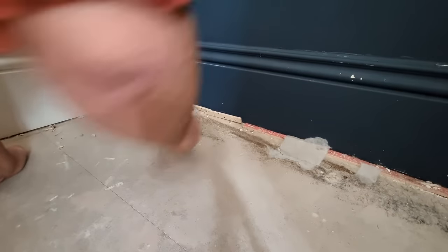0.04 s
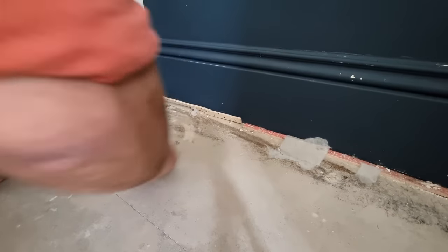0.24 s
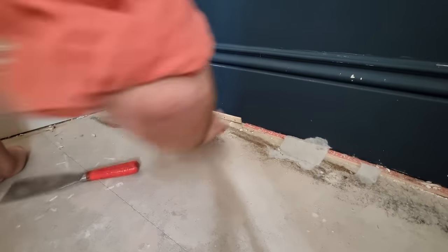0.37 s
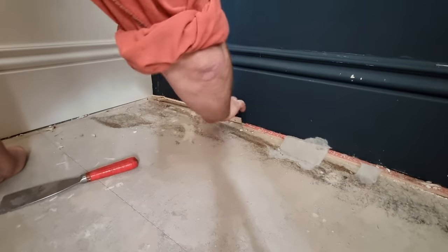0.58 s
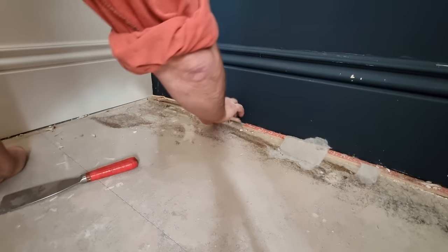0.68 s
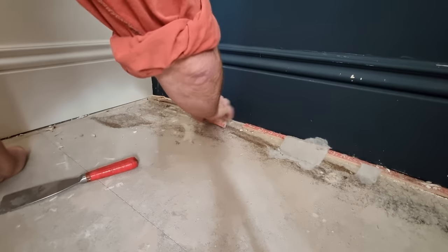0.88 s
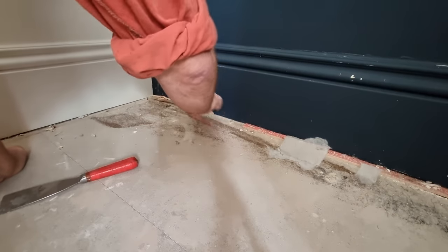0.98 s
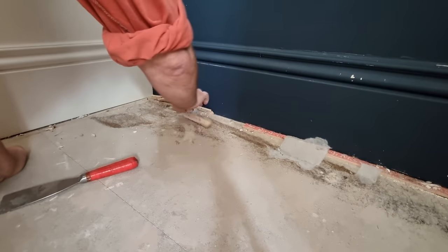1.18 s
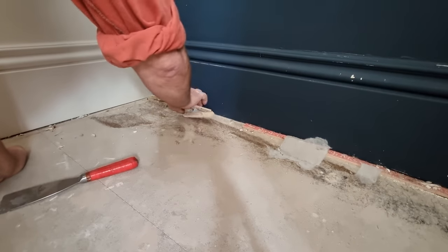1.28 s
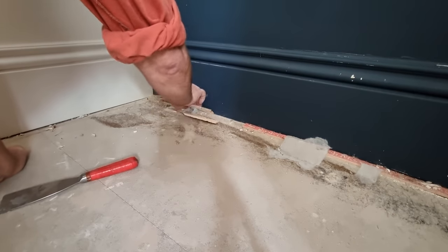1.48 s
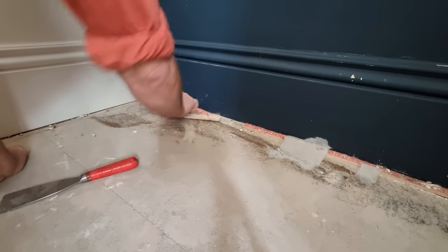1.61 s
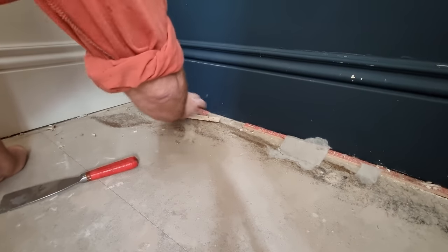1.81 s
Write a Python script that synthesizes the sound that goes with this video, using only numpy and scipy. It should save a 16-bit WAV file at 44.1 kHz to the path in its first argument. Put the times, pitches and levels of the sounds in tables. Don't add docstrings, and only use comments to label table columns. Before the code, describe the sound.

Dry wood snapping and scraping along a floor edge, opening with a flat metal tool clattering down beside loud cracks and low thumps, then sparser snaps and grit ticks; close stereo microphone, stronger at left, short bare-room echo.

```python
import sys
import numpy as np
from scipy import signal
from scipy.fft import rfft, irfft, next_fast_len
from scipy.io import wavfile
from scipy.ndimage import uniform_filter1d

SR = 44100
rng = np.random.default_rng(int(sys.argv[2]) if len(sys.argv) > 2 else 0)


def output_pcm(signal):
    pcm = np.clip(np.atleast_2d(signal).T, -1, 1) * 32767
    wavfile.write(sys.argv[1], SR, np.round(pcm).astype(np.int16))


def decibels_to_gain(level_db):
    exponent = np.asarray(level_db, float) / 20
    return 10 ** exponent


N = 81585


def unit(x):
    return x / np.sqrt(np.mean(x ** 2) + 1e-20)


def along(points, hz):
    f, value = np.transpose(points)
    return np.interp(np.log(hz + 1), np.log(f + 1), value)


def filtered(x, response):
    size = next_fast_len(x.shape[-1] + SR // 20)
    spectrum = rfft(x, size) * response(np.fft.rfftfreq(size, 1 / SR))
    return irfft(spectrum, size)[..., :x.shape[-1]]


def peak(f, hz, width):
    return 1j * f * width / (hz * hz - f * f + 1j * f * width)


def above(f, hz):
    return (1j * f) ** 2 / (hz * hz - f * f + 1.4j * f * hz)


def add(track, s, x):
    i = round(s * SR)
    x = x[:N - i]
    track[i:][:len(x)] += x


def ring(modes, attack_s, spread_db):
    t = np.arange(SR // 2) / SR
    hz, db, t60 = np.transpose(modes)[:, :, None]
    size = decibels_to_gain(db + spread_db * rng.standard_normal(hz.shape) - 60 * t / t60)
    split = 0.004
    beating = 1 - np.sin(np.pi * split * hz * t) ** 2 / 2
    tone = (size * np.sin(2 * np.pi * hz * t) * beating).sum(0)
    return tone * (1 - np.exp(-t / attack_s)) * np.cos(t / t[-1] * np.pi / 2)


def burst(length_s, response):
    t = np.arange(SR // 10) / SR
    fade = decibels_to_gain(-35 * (t / length_s) ** 2.21) * np.minimum(t / 0.002, 1)
    z = rfft(np.sign(rng.standard_normal(len(t))) * fade)
    z = z / np.sqrt(uniform_filter1d(abs(z) ** 2, size=50))
    even = irfft(z, len(t)) * np.cos(t / t[-1] * np.pi / 2) ** 2
    x = filtered(even, response)
    return x / abs(x).max()


def noise(spectrum):
    return unit(filtered(rng.standard_normal(N), lambda f: decibels_to_gain(along(spectrum, f)) * (f > 30)))


# (time [s], clack peak level [dB], clack pitch [Hz], handle ring level [dB])
TOUCHES = [
    (.204, -20, 4380, -28),
    (.2375, -23.5, 3500, -32.5),
    (.2495, -34, 6400, -40),
    (.280, -18, 2620, -16.5),
    (0.335, -24, 5000, -42.5),
    (.3445, -25, 3800, -39),
    (.3565, -30.5, 5300, -31),
    (0.397, -25.5, 4700, -60),
    (0.417, -15, 4900, -30),
    (0.4365, -21.5, 5030, -40),
]
# (lowest level [dB], second level [dB], third level [dB], upper level [dB])
FAMILY_WAKES = [(-48.5, -25, -26, -27.5), (-36.5, -26, -27.5, -29.5), (-25, -25.5, -19, -39),
                (-23, -61, -33.5, -56), (-38.5, -60, -43, -23), (-42, -53, -47, -33), (-40, -46, -50, -55),
                (-34, -62, -43, -35), (-21.5, -42, -25, -22.5), (-30, -36, -44, -29)]
BLADE_PITCHES = [3268, 3323, 3408, 4885, 6714, 8393, 8839, 10870, 11310, 12510, 13430, 14170]
# (level [dB], t60 [s])
BLADE_RINGING = [(-7, 0.37), (-2.5, 0.21), (-14, 0.328), (-3, 0.46), (-7.5, 0.33), (-10, 0.13), (-1, 0.062),
                 (-11, 0.072), (-2.5, 0.051), (-28, .11), (-5, 0.088), (-15.5, 0.12)]
BLADE_FAMILIES = [0, 0, 0, 1, 2, 3, 3, 3, 3, 3, 3, 3]
# (pitch [Hz], level [dB], t60 [s])
HANDLE_MODES = [(663, -5, 0.17), (685.5, -7, 0.37), (719, -2.5, 0.19), (730, -8, 0.047), (1381, 6, 0.024)]
# (pitch [Hz], level [dB], t60 [s])
EARLIER_TOUCH = [(684, -52.5, 0.15), (189, -52, 0.257), (374, -61, 0.16), (3070, -63.5, 0.21),
                 (4890, -71, 0.67), (6600, -56, 0.34)]


def chisel():
    out = np.zeros(N)
    add(out, 0, ring(EARLIER_TOUCH, 0.001, spread_db=6.5))
    for (s, clack_db, clack_hz, handle_db), wake in zip(TOUCHES, FAMILY_WAKES):
        blade = [(hz, db + wake[family], t60)
                 for hz, (db, t60), family in zip(BLADE_PITCHES, BLADE_RINGING, BLADE_FAMILIES)]
        add(out, s, ring(blade, 0.00052, spread_db=2.5))
        add(out, s, decibels_to_gain(handle_db) * ring(HANDLE_MODES, 0.00024, spread_db=3.5))

        def clack(f):
            return peak(f, clack_hz, 0.3 * clack_hz) ** 2 + decibels_to_gain(3) * peak(f, 3300, 4100) ** 2

        add(out, s, decibels_to_gain(clack_db) * burst(0.0084, clack))
    return out


# (time [s], peak level [dB], pitch [Hz], length [s], brightness [dB])
WOOD_SNAPS = [(0.202, -18.5, 1870, 0.022, -38.5), (0.235, -12, 1790, 0.016, -41.5),
              (0.277, -7, 1320, 0.014, -52.5), (0.284, -19.5, 890, 0.11, -40.5),
              (0.353, -15, 670, 0.03, -47), (0.552, -33, 860, 0.0083, -41), (0.652, -40.5, 830, 0.065, -52),
              (0.7, -47.5, 890, 0.065, -26), (0.738, -44.5, 2000, 0.014, -19),
              (0.7458, -26.5, 1940, 0.017, -17.5), (0.991, -26.5, 940, 0.017, -40),
              (1.0, -23, 1134, 0.02, -34), (1.101, -21, 634, 0.0088, -20.5),
              (1.185, -23, 1150, 0.022, -21.5), (1.21, -35.5, 845, 0.033, -44),
              (1.313, -35, 1120, 0.27, -17), (1.333, -12.5, 1660, 0.0097, -31),
              (1.366, -22, 1820, 0.02, -21.5), (1.548, -28.5, 3070, 0.051, -7),
              (1.56, -21.5, 920, 0.024, -53), (1.577, -25.5, 1650, 0.013, -14),
              (1.621, -26.5, 1040, 0.029, -19), (1.719, -14, 1900, 0.0098, -21.5),
              (1.7446, -23.5, 1700, 0.01, -18)]
# (pitch [Hz], level [dB])
STRIP_MODES = [(380, -7), (560, -1), (790, 3), (1150, 4.5), (1440, -1.5), (1800, -3.5), (2350, -1),
               (3000, -6.5)]


def snaps():
    out = np.zeros(N)
    for s, db, hz, length_s, bright_db in WOOD_SNAPS:

        def wood(f):
            body = decibels_to_gain(-8) + sum(decibels_to_gain(mode_db) * peak(f, c, 0.13 * c) for c, mode_db in STRIP_MODES)
            excited = peak(f, hz, 0.96 * hz) ** 2 + decibels_to_gain(-2) * peak(f, 850, 470)
            return body * excited + decibels_to_gain(bright_db) * peak(f, 4900, 8100) ** 2

        add(out, s, decibels_to_gain(db - 3) * burst(length_s, wood))
    return out


# (time [s], peak level [dB], pitch [Hz], length [s], fizz [dB])
GRIT_TICKS = [(0.697, -57, 3200, 0.018, -29.5), (0.714, -41.5, 3120, 0.12, -29),
              (.7315, -40, 4360, 0.016, -24.5), (0.768, -47, 2820, 0.0068, -25),
              (0.777, -44.5, 2930, 0.011, -32), (.7978, -32, 7800, 0.014, 11),
              (.814, -46.5, 5030, 0.016, -22), (0.839, -61.5, 7200, 0.02, -28),
              (1.099, -40.5, 3170, 0.019, -10), (1.116, -52, 3200, .012, -12),
              (1.207, -47, 3050, 0.015, -25), (1.472, -47, 3910, 0.014, -13),
              (1.487, -31.5, 2880, 0.018, -6.5), (1.4982, -18, 5200, 0.015, 6.5),
              (1.5504, -54, 4890, 0.022, -10), (1.333, -37.5, 6300, 0.0085, -20.5),
              (1.588, -42, 2570, 0.0069, -8), (1.624, -34, 2820, 0.0067, -13.5),
              (1.718, -35.5, 6500, 0.0087, -23), (1.827, -53.5, 8300, 0.028, 0),
              (0.418, -24, 5400, 0.0053, -22), (.7455, -36.5, 2740, 0.015, -32),
              (.205, -24.5, 2140, 0.012, -26), (1.522, -42, 4600, .015, -11), (1.544, -46, 3200, 0.0063, 0)]


def ticks():
    out = np.zeros(N)
    for s, db, hz, length_s, fizz_db in GRIT_TICKS:

        def grit(f):
            return peak(f, hz, 0.7 * hz) ** 2 + decibels_to_gain(fizz_db) * peak(f, 9800, 23000) ** 2

        add(out, s, decibels_to_gain(db + 2.26) * burst(length_s, grit))
    return out


# (time [s], length [s], level [dB])
STROKES = [
    (-.03, .1, -58),
    (0.217, 0.27, -30),
    (0.509, 0.25, -52.5),
    (0.716, .16, -45.5),
    (1.092, 0.2, -48.5),
    (1.279, 0.57, -58.5),
    (1.486, 0.077, -38),
    (1.565, 0.025, -26),
]
# (frequency [Hz], level [dB per Hz])
SCRAPE_COLOUR = [(150, -12.5), (300, 9), (900, -0.5), (2500, -5.5), (4500, -11), (7300, -18), (9000, -11),
                 (16000, -68)]


def scrape():
    grains_per_s, spread_db, hiss = 2500, 2, 0.8
    rise_s, fall_db = 0.008, 13.5
    t = np.arange(N) / SR
    hits = rng.random(N) < grains_per_s / SR
    sizes = decibels_to_gain(-spread_db * np.log(1.03 - rng.random(N)))
    rub = unit(hits * sizes * rng.standard_normal(N)) + hiss * rng.standard_normal(N)
    strokes = np.zeros(N)
    for s, length_s, db in STROKES:
        fall = decibels_to_gain(db - fall_db * np.clip((t - s) / length_s, 0, 1))
        start = np.clip((t - s) / rise_s, 0, 1)
        end = np.clip((s + length_s - t) / 3 / rise_s, 0, 1)
        strokes += fall * start * end
    return strokes * unit(filtered(rub, lambda f: decibels_to_gain(along(SCRAPE_COLOUR, f))))


# (time [s], peak level [dB], hardness [dB])
BLOWS = [(0.204, -23, -9), (0.282, -12.5, -7.5), (.299, -30, -14), (0.334, -19.5, -11), (0.361, -11, -11),
         (0.396, -56, -25), (0.434, -15.5, -12), (0.548, -60, -16), (0.713, -35, -26.5), (0.763, -38.5, -7),
         (0.996, -43, 0.5), (1.19, -52.5, 11), (1.334, -48.5, 9.5), (1.722, -50, 3.5), (1.49, -28, -13),
         (1.504, -22, -20), (1.557, -25.5, -23), (1.474, -42, -7), (1.622, -38.5, -27), (1.831, -38.5, -23)]
# (pitch [Hz], level [dB], t60 [s])
BOARD_MODES = [(62, -28.5, 0.054), (77.5, 2, 0.13), (103.3, -5.5, 0.19), (142, -8.5, 0.12)]
# (pitch [Hz], level [dB], t60 [s])
JOIST_MODES = [(168, -2.5, 0.086), (220.5, -6, 0.18), (262, -1.5, 0.087), (338.5, -2, 0.12),
               (379, -12, 0.18), (485, -7, 0.15), (547.4, -6, 0.15)]
# (time [s], level [dB], pitch [Hz], t60 [s])
LOOSE_BOARD = [(.553, -31.5, 262, 0.079), (0.576, -31.5, 244.5, 0.099), (.598, -37.5, 305, 0.043),
               (0.623, -26, 258, 0.098), (.655, -36, 260, 0.07), (0.691, -46, 354, .06),
               (1.102, -24.5, 254.3, 0.038), (1.116, -37.5, 262, 0.13), (1.004, -39, 293, 0.052),
               (1.34, -35, 360, 0.065), (1.734, -38, 370, 0.077), (1.236, -35, 349, 0.068)]
# (time [s], level [dB])
WEIGHT = [(0, -64), (.85, -61), (1.15, -50), (1.35, -45.5), (1.6, -45.5), (1.85, -76)]
# (frequency [Hz], level [dB per Hz])
SWAY_COLOUR = [(22, 38), (38, 16.5), (50, 22.5), (120, 16), (300, -70)]


def boards():
    out = np.zeros(N)
    for s, db, hard_db in BLOWS:
        low = ring(BOARD_MODES, 0.001, spread_db=0)
        joists = ring(JOIST_MODES, 0.001, spread_db=2.5)
        add(out, s, decibels_to_gain(db + 2) * (low + decibels_to_gain(hard_db) * joists))
    for s, db, hz, t60 in LOOSE_BOARD:
        add(out, s, ring([(hz, db, t60)], 0.00046, spread_db=3))
    weight_db = np.interp(np.arange(N) / SR, *np.transpose(WEIGHT))
    return decibels_to_gain(weight_db) * noise(SWAY_COLOUR) + filtered(out, lambda f: above(f, 62.7) ** 2)


# (frequency [Hz], t60 [s])
WALL_DECAY = [(100, 0.69), (500, 0.46), (2000, 0.26), (6000, 0.26), (14000, 0.19)]


def walls(x):
    out, step = np.zeros(N), SR // 8
    for i in range(0, N, step):
        hz, t, z = signal.stft(rng.standard_normal(SR // 3), SR, nperseg=256)
        decay = decibels_to_gain(-60 * t / along(WALL_DECAY, hz)[:, None])
        tail = signal.istft(z * decay, SR, nperseg=256)[1]
        answer = signal.fftconvolve(x[i:i + step], tail / np.linalg.norm(tail))
        add(out, i / SR + 0.003, answer)
    return decibels_to_gain(-10.5) * filtered(out, lambda f: above(f, 75))


# (frequency [Hz], level [dB per Hz])
HUSH_COLOUR = [(35, -95), (70, -2), (250, -15), (700, -27), (2000, -28), (4000, -30), (7200, -31),
               (9500, -30)]


def hush():
    return decibels_to_gain(-61.5) * noise(HUSH_COLOUR)


# (frequency [Hz], left over right [dB])
RIGHT_LOSS = [(170, 15), (300, 9), (640, 5), (1410, 9), (3100, 13), (6820, 19), (15000, 25)]
# (frequency [Hz], left lead [rad])
LEFT_LEAD = [(60, 0.4), (130, 0.1), (260, -2), (860, -2), (2400, -1.74), (9000, -3)]
# (frequency [Hz], level [dB])
RIGHT_ONLY = [(60, -12), (170, -3), (700, 3), (3000, 6), (8000, 8)]


def scene():
    near = chisel() + snaps() + ticks() + scrape() + boards()
    left = near + walls(near) + hush()
    other = walls(near) + hush()
    turned = filtered(left, lambda f: np.exp(-1j * along(LEFT_LEAD, f)))
    stray = filtered(other, lambda f: decibels_to_gain(along(RIGHT_ONLY, f)))
    right = filtered(turned + stray, lambda f: decibels_to_gain(-along(RIGHT_LOSS, f)))
    return np.array([left, right])


def band_limit(x):
    return signal.sosfilt(signal.butter(12, 16490, fs=SR, output="sos"), x)


# (frequency [Hz], level [dB])
PORT_COLOUR = [(5500, 0.46), (7300, 1.5), (8300, -10.5), (14000, -11)]


def record(dry):
    soft_top, top_hz = 0.62, 16400
    soft = dry / (1 + abs(dry / soft_top) ** 4) ** (1 / 4)
    mix = filtered(soft, lambda f: decibels_to_gain(along(PORT_COLOUR, f)) * (f < top_hz))
    return band_limit(mix)


dry = scene()
out = record(dry)
output_pcm(out)
```